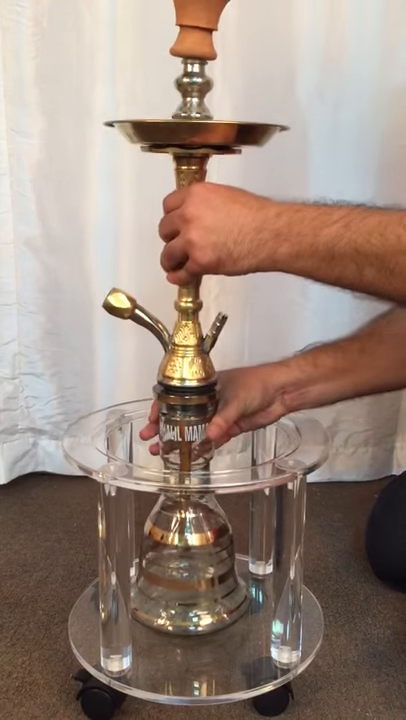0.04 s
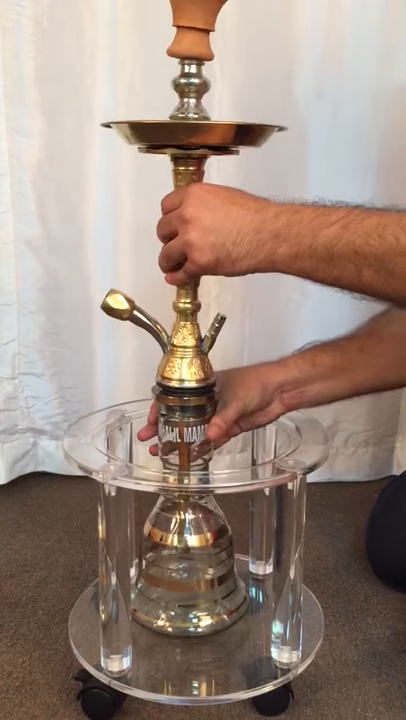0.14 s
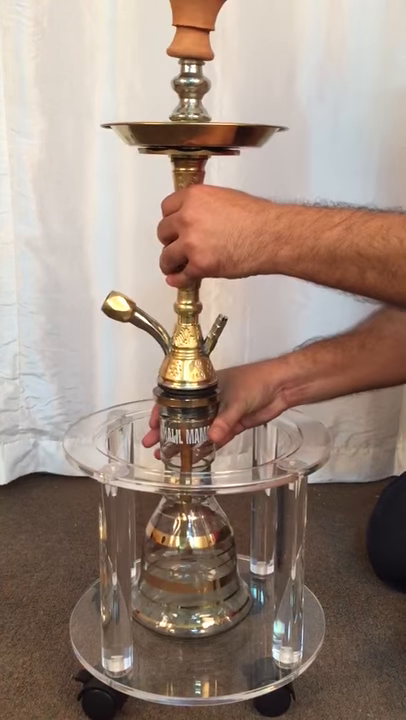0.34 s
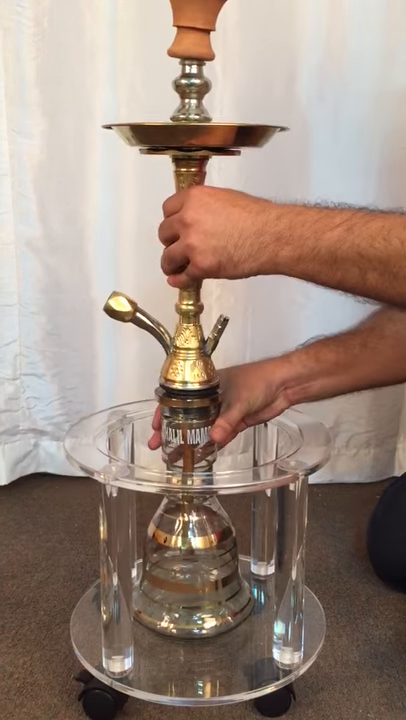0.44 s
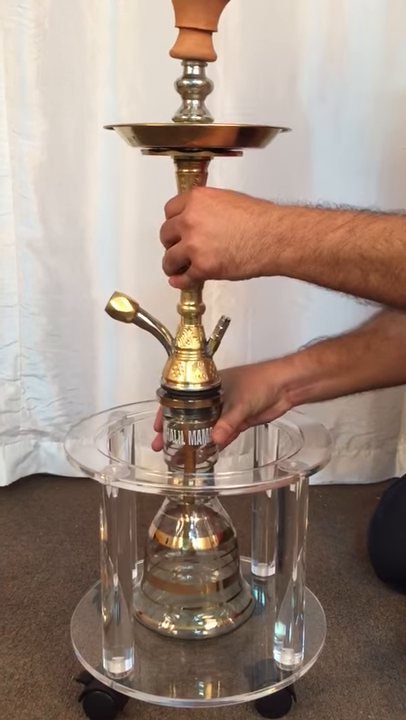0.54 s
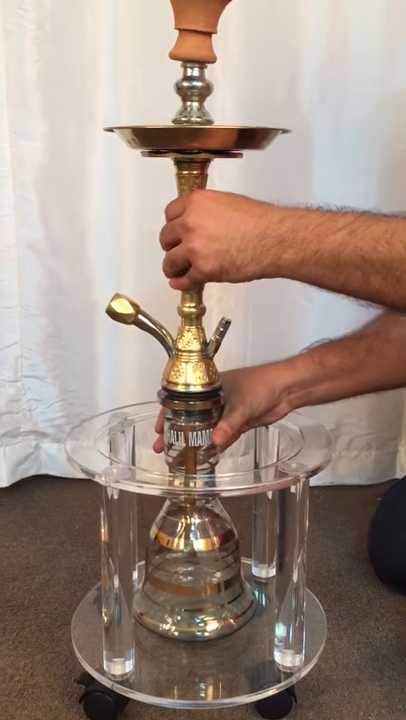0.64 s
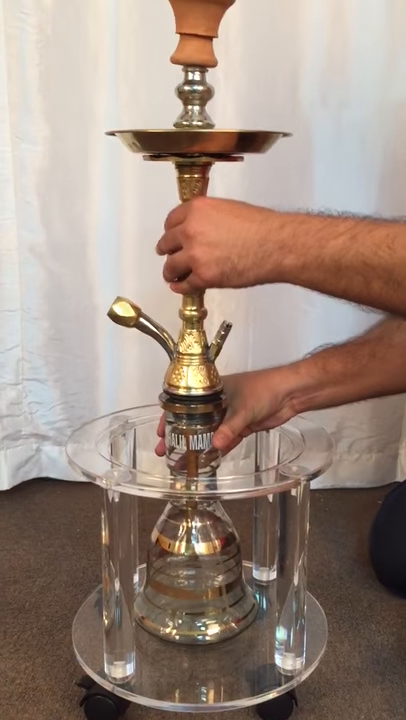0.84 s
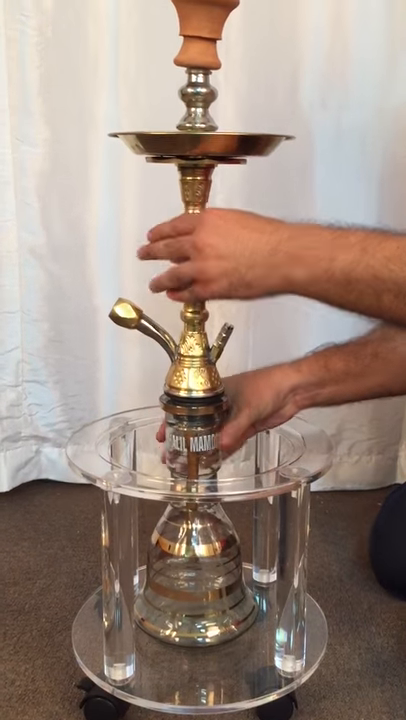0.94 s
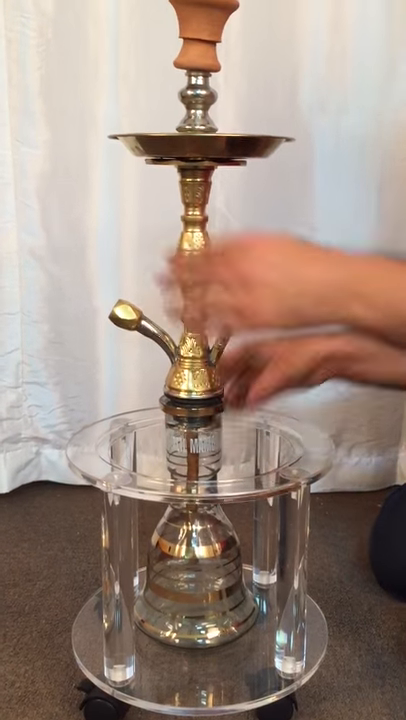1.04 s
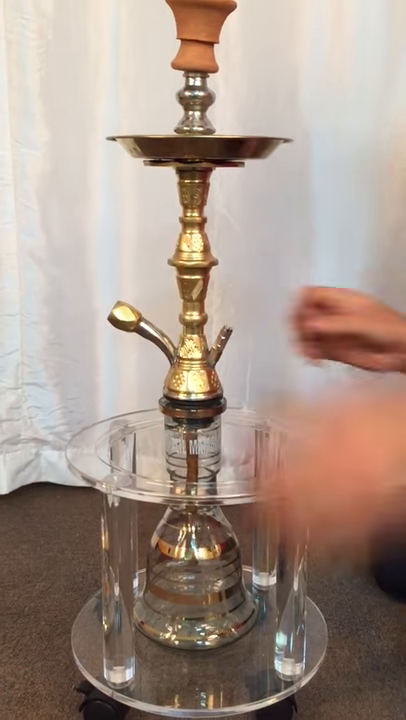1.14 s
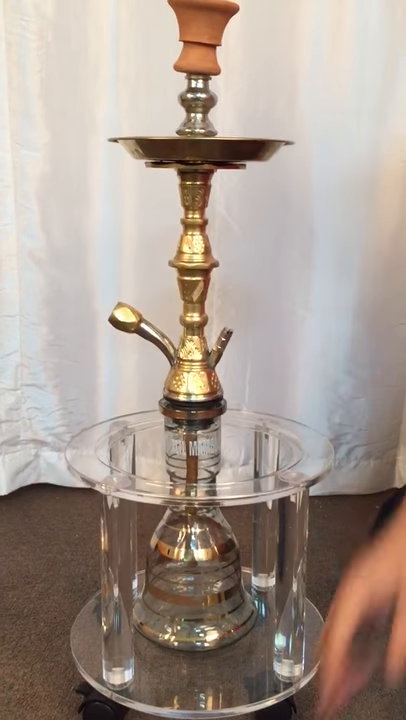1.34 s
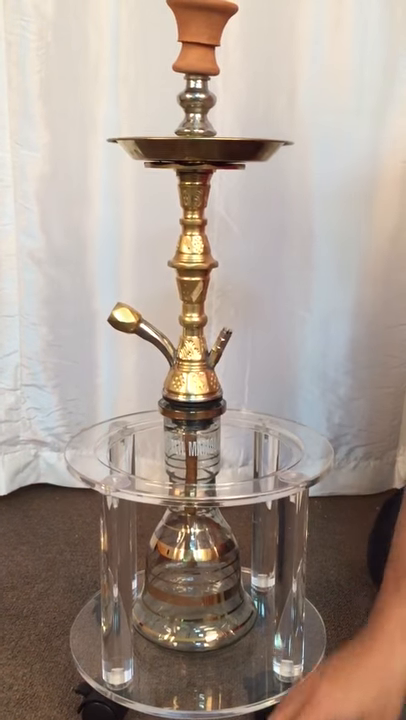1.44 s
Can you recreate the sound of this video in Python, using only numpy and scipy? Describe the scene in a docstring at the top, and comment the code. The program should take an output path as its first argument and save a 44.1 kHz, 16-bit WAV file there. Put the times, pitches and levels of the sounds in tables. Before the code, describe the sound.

One sharp knock as a glass hookah base is set down in an acrylic stand.

```python
"""In a carpeted room, about a metre away, a brass hookah with a glass base is set down in an acrylic stand.
The impact excites damped modes: base and plate knock once, and the brass rings thinly. Friction makes
the base scuff as it settles, a loose fitting ticks, and the stand rumbles softly on the carpet.
Under it all are a mains hum and the soft rush of the room."""
import sys
import numpy as np
from scipy import signal
from scipy.fft import rfft, irfft
from scipy.io import wavfile
from scipy.ndimage import uniform_filter1d

SR = 44100
rng = np.random.default_rng(int(sys.argv[2]) if len(sys.argv) > 2 else 0)


def to_wav(s):
    """Save 16-bit WAV."""
    ch = np.atleast_2d(s).T  # columns
    pcm = np.round(np.clip(ch, -1, 1) * 32767)  # PCM
    wavfile.write(sys.argv[1], SR, pcm.astype(np.int16))


N = 66150


def knock(start_s=0.212, level_db=-0.5, build_cycles=1.95, stand_build_s=0.049, brass_build_s=0.0017):
    """Impact excitation: glass strikes acrylic with a crack, and damped modes build up and decay."""
    # Each row: frequency in Hz, relative level in dB, time to fall 60 dB in seconds.
    body_modes = [(586.7, -3, 0.028), (642, -18.5, 0.032), (1110, -18.5, 0.033), (1147, -6.5, 0.019),
                  (1390, -31, 0.06), (1634, -16, 0.034), (1887, -35, 0.029), (2320, -23.5, 0.017),
                  (2567, -33.5, 0.044), (2805, -29.5, 0.018), (3016, -34, 0.013), (3867, -30.5, 0.011),
                  (4154, -39, 0.015)]  # glass base on the plate
    stand_modes = [(521, -33, 0.6), (546.5, -44.5, .42), (584, -33, 0.27), (657, -51, 0.17),
                   (700, -40, 0.22), (1120, -46, 0.31), (1216, -42, 0.26), (1400, -54, 0.12),
                   (1640, -33, 0.21), (1655, -50, .15)]  # faint after-ring of stand and tray
    brass_modes = [(5790, -55.5, 0.046), (5930, -51, .04), (6860, -61, 0.18), (11700, -48, 0.034),
                   (12000, -57.5, .04)]  # thin ring of stem and tray
    # Spectrum of the contact. Each row: frequency in Hz, relative level in dB.
    crack_spectrum = [(200, -20), (600, -10), (1500, 17.5), (3500, 4), (5000, -9), (8000, -8), (12000, -22)]
    t = since(start_s)
    body = sum(mode(t, hz, db, t60) * (1 - np.exp(-t * hz / build_cycles)) for hz, db, t60 in body_modes)
    stand = sum(mode(t, *row) for row in stand_modes) * (1 - np.exp(-t / stand_build_s))
    brass = sum(mode(t, *row) for row in brass_modes) * (1 - np.exp(-t / brass_build_s))
    crack = undb(-28.5) * decay(t, t60=0.012) * noise(crack_spectrum)
    # The plate radiates little below this band; the blunt contact excites little above it.
    radiation = signal.butter(4, [472, 6500], "band", fs=SR, output="sos")
    return undb(level_db) * (signal.sosfilt(radiation, body + stand + crack) + brass)


def ticks():
    """Free vibration: each contact of a loose fitting gives a broadband click and sets its modes ringing."""
    # Each row: start in seconds, ring gain in dB, click level in dB.
    contacts = [(0.2268, -70, -52.5), (0.5086, -59, -68), (.5120, -61, -60), (0.879, -80, -69)]
    # Each row: frequency in Hz, relative level in dB, time to fall 60 dB in seconds.
    fitting_modes = [(1170, 10, .018), (2500, 1, .018), (4020, 1, 0.036), (4350, 5.5, 0.016),
                     (4890, 3.5, .02), (5880, -6, 0.022), (8600, -9, .022), (9600, -7, 0.032),
                     (11800, 0, 0.02), (12330, -3.5, 0.039), (13900, -10, .025), (16700, -10, .03)]
    out = np.zeros(N)
    for start, ring_db, click_db in contacts:
        t = since(start)
        out += undb(ring_db) * sum(mode(t, *row) for row in fitting_modes)
        out += undb(click_db) * decay(t, t60=0.017) * rng.standard_normal(N)
    return out


def settling():
    """Sliding friction: glass slips a little on acrylic, giving dull scuffs and thin squeaks."""
    # Each row: centre in seconds, width in seconds, level in dB.
    scuffs = [(.398, 0.047, -55.5), (.427, 0.013, -52), (.443, 0.018, -54.5)]
    squeaks = [(.368, 0.033, -77.5), (.394, 0.011, -69.5)]
    # Each row: frequency in Hz, relative level in dB.
    scuff_spectrum = [(300, 1.5), (480, -12), (580, 5.5), (1000, 0), (1500, -16.5), (2500, -25),
                      (8000, -47), (17000, -57)]
    return swells(scuffs) * noise(scuff_spectrum) + swells(squeaks) * resonance(hz=6450, width_hz=220)


def rumble():
    """Forced vibration: the stand rumbles on the carpet while the hookah is shifted in it."""
    # Each row: centre in seconds, width in seconds, level in dB.
    shifts = [(.21, .42, -46.5)]
    # Each row: frequency in Hz, relative level in dB.
    spectrum = [(50, -39), (80, -3.5), (97, 3), (165, -1), (190, -25), (300, -49), (600, -62), (2000, -91)]
    return swells(shifts) * noise(spectrum)


def room(direct, tail_db=-9, gap_s=0.0037, rise_s=0.0011):
    """Reverberation: wall reflections and a diffuse tail, whose treble dies first, follow the sound."""
    # Each row: band centre in Hz, reverberation time in seconds.
    decay_times = [(250, 0.6), (600, 0.32), (1200, 0.27), (1800, .25), (3000, 0.25), (7000, 0.26),
                   (14000, .2)]
    # Reflections off the nearest walls. Each row: delay in seconds, gain in dB.
    echoes = [(0.022, -19.5), (.046, -30), (.092, -32.5)]
    t, hz = since(gap_s), np.fft.rfftfreq(N, 1 / SR)
    diffuse, tail = rfft(rng.standard_normal(N)), np.zeros(N)
    centres, t60s = zip(*decay_times)
    for share, t60 in zip(np.eye(len(centres)), t60s):
        band_weight = lookup(list(zip(centres, share)), hz)
        tail += irfft(diffuse * band_weight, N) * decay(t, t60)
    tail *= 1 - np.exp(-t / rise_s)
    response = undb(tail_db) * tail / np.sqrt(np.sum(tail ** 2))
    for delay, db in echoes:
        response[int(delay * SR)] += undb(db)
    return direct + signal.fftconvolve(direct, response)[:N]


def mains_hum():
    """Amplitude modulation: the two low tones of the mains waver slightly in level."""
    # Each row: frequency in Hz, rms level in dB, waver in dB.
    partials = [(58.95, -48.5, 0.8), (119.9, -45, -1.35)]
    hum = np.zeros(N)
    for hz, db, waver_db in partials:
        amplitude = np.sqrt(2) * undb(db + waver_db * drift(rate_hz=6.6))
        hum += amplitude * np.sin(2 * np.pi * (hz * since(0) + rng.random()))
    return hum


def room_rush(level_db=-50, waver_db=0.9):
    """Ambient noise: a broad spectrum, strongest in the bass, carries faint narrow resonances."""
    # Each row: frequency in Hz, bandwidth in Hz, rms level in dB.
    peaks = [(758, 19, -67.5), (1012, 14, -70), (1625, 4, -83), (1860, 7.3, -78.5), (2080, 17, -82.5)]
    # Each row: frequency in Hz, relative level in dB.
    spectrum = [(20, -25.5), (45, -3), (70, 2), (105, -6), (160, 0), (200, -5.5), (300, -6.5), (370, -13.5),
                (480, -22.5), (600, -18), (780, -18), (1100, -22), (1500, -27), (2100, -30.5),
                (3000, -36.5), (4500, -41.5), (7000, -44), (10000, -47.5), (17000, -49)]
    tones = sum(undb(db) * resonance(hz, width_hz) for hz, width_hz, db in peaks)
    return tones + noise(spectrum) * undb(level_db + waver_db * drift(rate_hz=24))


def mode(t, hz, db, t60):
    """A struck mode vibrates as a damped sinusoid."""
    return undb(db) * decay(t, t60) * np.sin(2 * np.pi * hz * t)


def decay(t, t60):
    """Exponential damping: a fall of 60 dB in t60 seconds."""
    return (t > 0) * np.exp(-np.log(1000) * t / t60)


def swells(events):
    """A Gaussian rise and fall for each event."""
    return sum(undb(db) * np.exp(-2 * ((since(0) - centre) / width) ** 2) for centre, width, db in events)


def resonance(hz, width_hz):
    """A resonator driven by white noise, scaled to rms 1."""
    resonator = signal.iirpeak(hz, hz / width_hz, fs=SR)
    return unit_rms(signal.lfilter(*resonator, rng.standard_normal(N)))


def noise(spectrum):
    """White noise shaped to a spectrum, scaled to rms 1."""
    gain = undb(lookup(spectrum, np.fft.rfftfreq(N, 1 / SR)))
    return unit_rms(irfft(rfft(rng.standard_normal(N)) * gain, N))


def drift(rate_hz):
    """Smoothed random steps with a spread near 1."""
    hold = int(SR / rate_hz)
    steps = np.repeat(rng.standard_normal(N // hold + 1), hold)
    return uniform_filter1d(steps, hold)[:N]


def lookup(table, hz):
    """Interpolate a table on a log-frequency axis."""
    points, values = np.array(table).T
    return np.interp(np.log(np.maximum(hz, 1)), np.log(points), values)


def since(start):
    """Seconds since a moment, zero before it."""
    return np.maximum(np.arange(N) / SR - start, 0)


def undb(db):
    """Decibels to amplitude ratio."""
    return 10 ** (np.asarray(db) / 20)


def unit_rms(x):
    """Scale to an rms of 1."""
    return x / np.sqrt(np.mean(x ** 2))


def scene():
    """Superposition: the reverberant contact sounds add to rumble, hum and rush in one channel."""
    contacts = knock() + ticks() + settling()
    return (room(contacts) + rumble() + mains_hum() + room_rush())[None]


def record(dry, cutoff_hz=17250):
    """Band limiting: a steep low-pass filter removes the highest treble."""
    return signal.sosfilt(signal.ellip(10, 0.1, 70, cutoff_hz, fs=SR, output="sos"), dry)


dry = scene()
out = record(dry)
to_wav(out)
```